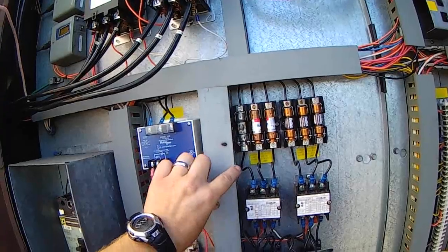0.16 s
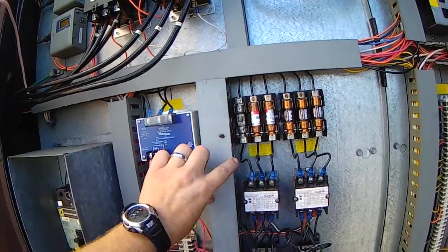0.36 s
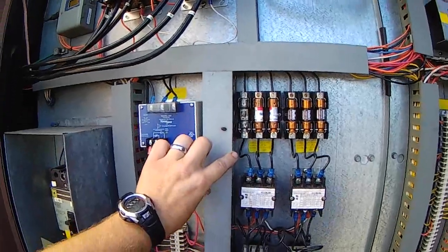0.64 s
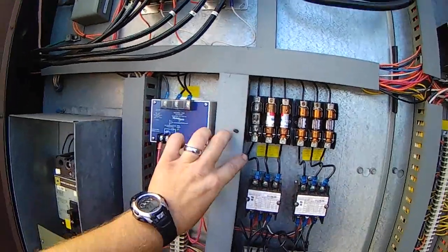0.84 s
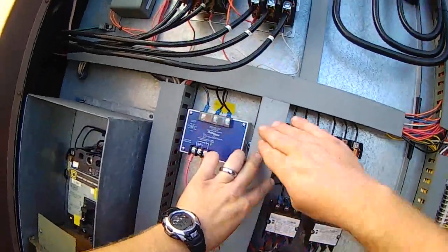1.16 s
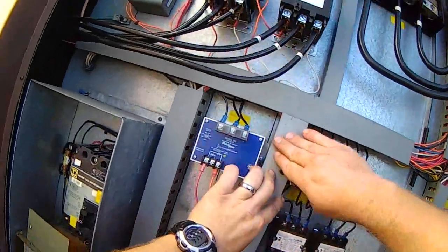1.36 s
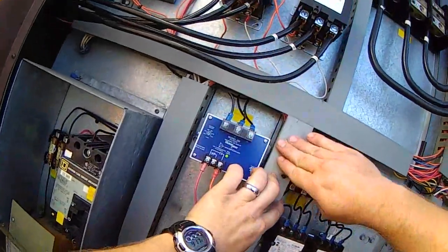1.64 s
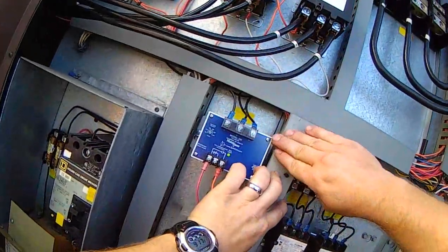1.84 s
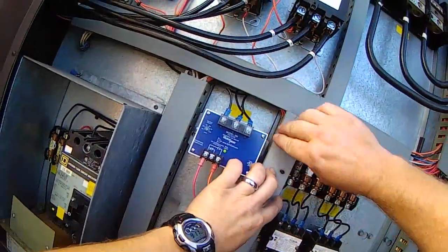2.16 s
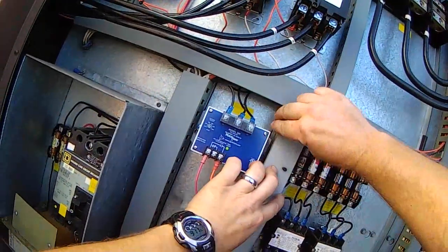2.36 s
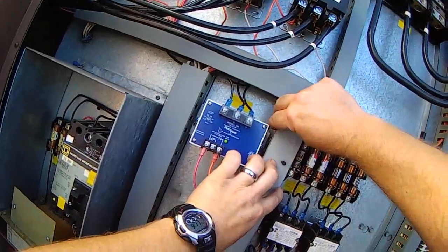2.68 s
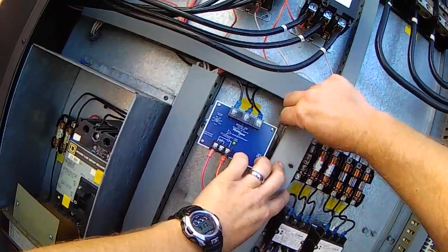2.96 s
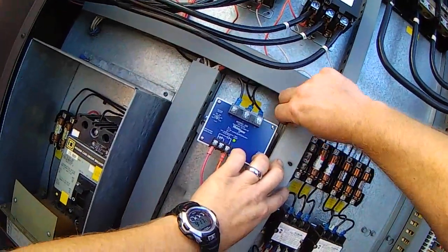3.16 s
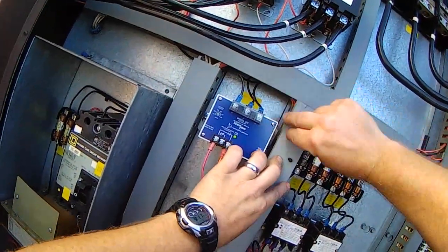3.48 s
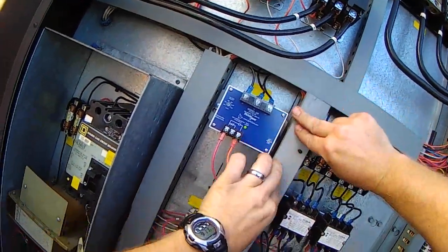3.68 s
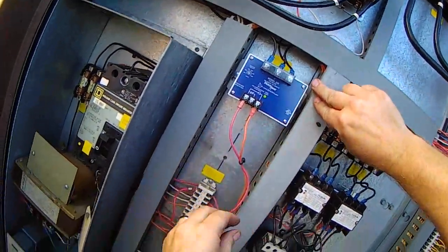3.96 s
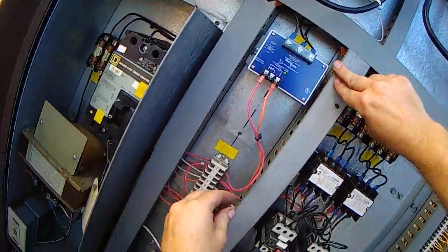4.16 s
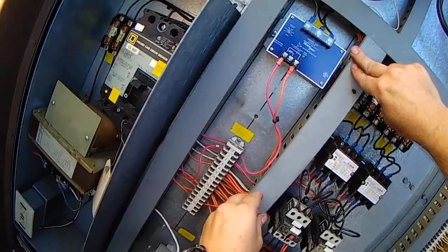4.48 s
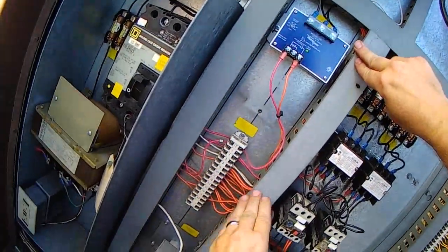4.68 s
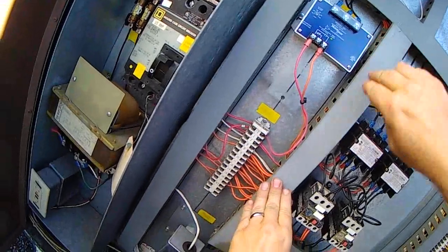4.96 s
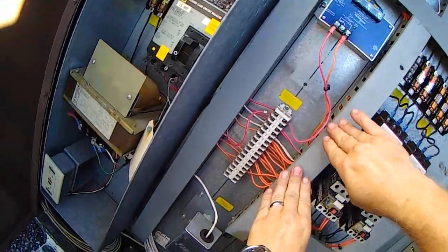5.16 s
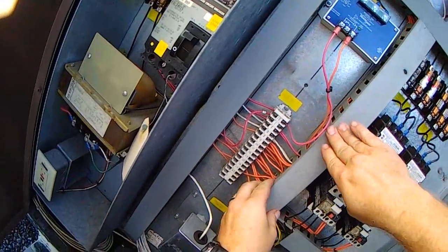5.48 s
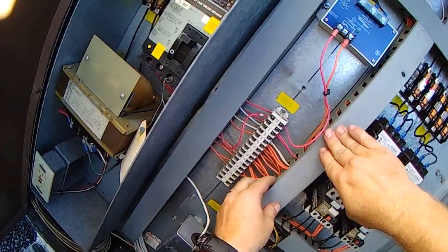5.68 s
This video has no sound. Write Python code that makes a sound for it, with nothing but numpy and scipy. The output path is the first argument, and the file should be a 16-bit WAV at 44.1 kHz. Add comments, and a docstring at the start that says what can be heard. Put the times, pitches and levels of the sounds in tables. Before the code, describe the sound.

Dry plastic clicks, crackles and soft thumps close by as a cabinet cover is pressed shut, with a constant motor hum behind.

```python
"""At an open steel cabinet near a large air-conditioning unit, hands press a plastic wiring-duct cover shut.
The cover snaps and creaks by stick-slip: bursts of small jolts ring its damped modes, and its body thumps low
under some snaps. Sliding fingers rub it, and a nail or clip ticks. The unit hums with sines on multiples of one
shaft speed, beside tones of other motors and mains-fed coils, over a rumble of moving air made of shaped noise.
A small microphone with a dull top leans into the cabinet, which shifts the levels of the hum and the air."""
import sys
import numpy as np
from scipy import signal
from scipy.fft import rfft, irfft
from scipy.io import wavfile
from scipy.ndimage import uniform_filter1d

SR = 44100
rng = np.random.default_rng(int(sys.argv[2]) if len(sys.argv) > 2 else 0)


def digitize_waveform(pressure):
    """Quantize a signal to 16-bit integers and store it at the path in sys.argv[1].

    Rows of a 2-D input are taken as channels; values are limited to [-1, 1].
    """
    field = np.atleast_2d(pressure).T
    bounded = np.clip(field, -1, 1)
    quanta = np.round(bounded * 32767).astype(np.int16)
    wavfile.write(sys.argv[1], SR, quanta)


def field_ratio(decibels):
    """Amplitude ratio for a level in dB (20 dB per decade); scalars and array-likes work."""
    return 10 ** (np.asarray(decibels, dtype=float) / 20)


N = 257103  # length in samples

# Damped modes of the cover and the cabinet: mode_hz [Hz], level_db [dB, relative],
# t60_s [s, decay by 60 dB after one slip]
COVER_MODES = [(391, -2.5, 0.024), (456, -4, 0.031), (635.4, -5.5, 0.039), (782, 8.5, 0.012),
               (902.5, 3.5, 0.045), (928, 5.5, 0.029), (1110, 2, 0.021), (1281, 12, 0.01),
               (1434, 10, 0.012), (1634, -3, 0.03), (1790, -2.5, 0.017), (1875, -4, 0.021),
               (2160, -2.5, 0.02), (2305, -3.5, .012), (2500, 2.5, 0.02), (2705, 0, 0.018),
               (2890, 2.5, 0.018), (3073, 5, 0.018), (3280, 1.5, 0.027), (3450, 6, 0.011),
               (3656, 2.5, 0.014), (3877, -1.5, 0.022), (4040, -3, 0.015), (4360, 4.5, 0.0089),
               (4760, 7, 0.0057), (4990, 9.5, 0.0081), (5530, 10, 0.0067), (5850, -3.5, 0.049),
               (6150, 6, 0.0064), (6500, -3, 0.032), (6890, 1.5, 0.0052), (7590, -7.5, 0.03),
               (7240, -1.5, 0.021), (7824, -7, 0.023)]
BODY_TOP_HZ = 2200  # the cover's body modes lie below this


def evened(x):
    """Normalization: scales a signal to an rms of 1."""
    return x / np.sqrt(np.mean(x ** 2) + 1e-20)


def read(points, hz):
    """Spectral interpolation: reads a spectrum table on a log-frequency axis."""
    f, value = np.transpose(points)
    return np.interp(np.log(hz + 1), np.log(f + 1), value)


def add(mix, start_s, sound):
    """Superposition: pressures add, so a sound is summed into the mix from start_s."""
    part = mix[round(start_s * SR):][:len(sound)]
    part += sound[:len(part)]


def drift(t, top_hz):
    """Slow random fluctuation: sines of random phase whose power falls as 1/f, scaled to an rms of 1."""
    total = 0
    for f in np.geomspace(top_hz / 20, top_hz, 12):
        total = total + np.sin(2 * np.pi * (f * t + rng.random())) / np.sqrt(f)
    return evened(total)


def lean(t):
    """Receiver position: how far the microphone leans into the cabinet, from 0 to 1."""
    # Path of the microphone: time_s [s], depth [0-1]
    lean_path = [(0, 0), (1.3, 0.05), (1.7, 0.8), (3, 0.79), (4.4, 0.71), (5.1, 0.88), (5.83, 0.9)]
    return np.interp(t, *np.transpose(lean_path))


def ring(body_db, body_hz, middle_hz, edge_db, spread_db):
    """Modal impulse response of the cover to one slip; its free length picks the modes that speak up."""
    edge_from_hz = 4300
    hz, db, t60 = np.transpose(COVER_MODES)[:, :, None]
    t = np.arange(2000) / SR
    level_chance, pitch_chance = rng.standard_normal((2, len(COVER_MODES), 1))
    # levels fall away with the squared distance in octaves from each favoured pitch, down to a floor
    body = (body_db - np.minimum(14 * np.log2(hz / body_hz) ** 2, 9)) * (hz < BODY_TOP_HZ)
    in_middle = (hz > BODY_TOP_HZ) * (hz < edge_from_hz)
    middle = -np.minimum(120 * np.log2(hz / middle_hz) ** 2, 7) * in_middle
    edge = edge_db * (hz > edge_from_hz)
    level_db = db + body + middle + edge + spread_db * level_chance
    decay = field_ratio(level_db - 60 * t / t60)
    # a finger is soft: low modes build over a cycle, none at once
    soft = 1 - np.exp(-1.1 * np.minimum(hz, 1400) * t)
    # neighbouring modes start in opposite directions
    sides = (-1.) ** np.arange(len(COVER_MODES))[:, None]
    waves = np.sin(2 * np.pi * hz * (1 + 0.014 * pitch_chance) * t)
    return (decay * soft * sides * waves).sum(0)


def slips(count, per_s, uneven_db):
    """Stick-slip friction: a random train of jolts of uneven size and either direction."""
    when, side, size = rng.random((count, 3)).T
    happens = when < per_s / SR
    return happens * np.sign(side - .5) * field_ratio(-uneven_db * np.log(size + 0.11))


def snap(peak_db, body_hz, body_db, middle_hz, edge_db, slide_s):
    """Stick-slip release: slips start hard, ease while the latch slides, then die into the cabinet's echo."""
    rise_s, slide_fade_db, dying_t60_s = 0.0004, -4.5, 0.016
    first_slip = 2.6  # the break-away jolt, against a slip of 0 dB
    echo_db, echo_t60_s = -22, 0.13
    t = np.arange(10000) / SR
    rise = np.minimum(t / rise_s, 1)
    slide_db = slide_fade_db * np.minimum(t / slide_s, 1)
    dying_db = -60 * np.maximum(t - slide_s, 0) / dying_t60_s
    jolts = slips(count=len(t), per_s=650, uneven_db=3.5) * rise * field_ratio(slide_db + dying_db)
    jolts[round(rise_s * SR)] = first_slip
    # many overlapping reflections act as decaying noise
    echo = rise * field_ratio(echo_db - 60 * t / echo_t60_s) * rng.standard_normal(len(t))
    response = ring(body_db, body_hz, middle_hz, edge_db, spread_db=0.5)
    sound = signal.fftconvolve(jolts + echo, response)
    return field_ratio(peak_db) * sound / (abs(sound).max() + 1e-9)


def thump(peak_db, body_hz):
    """Selective modal excitation: a soft onset wakes the cover's body modes alone, mostly near body_hz."""
    body_modes = [mode for mode in COVER_MODES if mode[0] < BODY_TOP_HZ]
    hz, _, t60 = np.transpose(body_modes)[:, :, None]
    t = np.arange(3000) / SR
    near_db = -40 * np.log2(hz / body_hz) ** 2
    decay = field_ratio(near_db - 60 * t / (t60 + 0.11))  # each t60 is 0.11 s longer than after a slip
    soft = 1 - np.exp(-t / 0.00069)
    waves = np.sin(2 * np.pi * (hz * t + rng.random(hz.shape)))
    sound = (decay * soft * waves).sum(0)
    return field_ratio(peak_db) * sound / abs(sound).max()


def tick(impulse_db):
    """Hard impact: one impulse and a faint short scatter through a minimum-phase filter."""
    # Spectrum of the strike: freq_hz [Hz], level_db [dB, relative]
    tick_colour = [(710, -6), (1200, -4.5), (2670, -13), (4100, -23), (6370, -21), (7310, -24.5),
                   (7740, -28), (8400, -81), (10900, -101), (18500, -120)]
    log_gain = np.log(field_ratio(read(tick_colour, abs(np.fft.fftfreq(2048, 1 / SR)))))
    # phase derived from the log gain leaves no ringing ahead of the strike
    pulse = np.fft.ifft(np.exp(np.conj(signal.hilbert(log_gain)))).real[:1024]
    t = np.arange(1500) / SR
    scatter = 0.046 * rng.standard_normal(1500) * field_ratio(-60 * t / 0.041)
    scatter[0] = 1
    return field_ratio(impulse_db) * np.convolve(scatter, pulse / abs(pulse).max())


def rub():
    """Sliding friction: dense slips under the fingers ring the same cover; each stroke swells and eases."""
    # Strokes along the cover: start_s [s], length_s [s], level_db [dB rms at the top of the swell]
    strokes = [(3.70, 0.27, -43.5)]
    jolts = slips(count=N, per_s=2500, uneven_db=1)
    response = ring(body_db=7, body_hz=1200, middle_hz=3100, edge_db=-23, spread_db=0)
    scuff = signal.fftconvolve(jolts, response)[:N]
    t = np.arange(N) / SR
    press = 0
    for start_s, length_s, level_db in strokes:
        progress = np.clip((t - start_s) / length_s, 0, 1)
        press = press + field_ratio(level_db) * np.sin(np.pi * progress) ** 2
    return press * evened(scuff)


def hum():
    """Harmonic series of a rotating shaft, with other tones: sines waver as sound paths shift."""
    shaft_hz = 28.1
    # Multiples of the shaft speed with the microphone out: {multiple: level_db [dB rms]}
    order_db = {2: -48.5, 4: -58.5, 6: -62, 7: -64, 8: -48.5, 9: -60.5, 10: -56, 11: -50, 12: -49, 13: -57,
                14: -51.5, 15: -55, 16: -52, 17: -53.5, 18: -51, 19: -55.5, 22: -60, 23: -56, 26: -52.5, 28:
                -52.5, 32: -52.5, 35: -56.5}
    # What a full lean adds to some multiples: {multiple: change_db [dB]}
    lean_order_db = {6: 22.5, 8: -19, 10: 5, 11: 3, 12: 0.5, 16: -2, 18: -1.5, 28: -1, 32: 1.5}
    # Course of the 30th multiple: time_s [s], level_db [dB rms]
    thirtieth = [(0, -49), (1.3, -48), (1.7, -50), (2.2, -53), (3.1, -50), (4, -50.5), (4.7, -48),
                 (5.83, -47)]
    # Tones of other motors and of mains-fed coils: pitch_hz [Hz], level_db [dB rms]
    other_tones = [(45.6, -51), (116, -56), (120, -55), (148, -51), (240, -61), (360, -57), (907, -59),
                   (991, -62), (1026, -63), (1321, -62)]
    t = np.arange(0, N + 64, 64) / SR  # coarse time for the slow changes
    time = np.arange(N) / SR
    lines = []
    for k, db in order_db.items():
        lines.append((shaft_hz * k, db + lean_order_db.get(k, 0) * lean(t)))
    lines += other_tones
    lines.append((shaft_hz * 30, np.interp(t, *np.transpose(thirtieth))))
    total = 0
    for hz, db in lines:
        level_db = db + .7 * drift(t, top_hz=2.5) + 1.5 * drift(t, top_hz=25)
        turns = 0.03 * drift(t, top_hz=12)  # phase wander in cycles
        cycles = hz * time + np.interp(time, t, turns) + rng.random()
        level = np.interp(time, t, field_ratio(level_db))
        total = total + np.sqrt(2) * level * np.sin(2 * np.pi * cycles)
    return total


def air():
    """Broadband flow noise: random short-time spectra in drifting patches; the lean shifts their colour."""
    air_db = -35.5  # rms level
    # Spectrum of the moving air: freq_hz [Hz], level_db [dB per Hz, relative]
    air_colour = [(15, -25.5), (30, -4), (45, 2.5), (75, 0.5), (100, -2), (150, -5), (259, -10), (584, -12),
                  (833, -11), (1460, -16.5), (2300, -33.5), (3040, -27.5), (3820, -36), (4450, -48),
                  (5050, -40.5), (7390, -48), (8600, -70.5)]
    # What a full lean adds to the air: freq_hz [Hz], change_db [dB]
    lean_air = [(40, -1.5), (75, -4.5), (110, 3), (160, 3), (400, 0.5), (1200, -2.5), (4000, -3)]
    frames, hz = N // 256 + 5, np.fft.rfftfreq(1024, 1 / SR)
    a, b, patches = rng.standard_normal((frames, 513, 3)).T
    patches = uniform_filter1d(patches, size=10, axis=0)  # smooth over frequency
    patches = evened(uniform_filter1d(patches, size=12, axis=1))  # and over time
    t = np.arange(frames) * 256 / SR
    swell_db = read(lean_air, hz)[:, None] * lean(t)
    spectra = (a + 1j * b) * field_ratio(swell_db + 1.5 * patches)
    grain = signal.istft(spectra, nperseg=1024, noverlap=768)[1][:N]
    gain = field_ratio(read(air_colour, np.fft.rfftfreq(N, 1 / SR)))
    return field_ratio(air_db) * evened(irfft(rfft(grain) * gain, N))


def scene():
    """Superposition of the handling close by with the hum and the air."""
    # Snaps and creaks: start_s [s], peak_db [dB], body_hz [Hz, body centre], body_db [dB against the
    # middle modes], middle_hz [Hz, middle centre], edge_db [dB against the middle modes], slide_s [s]
    snaps = [(0.009, -32, 1270, -5, 3050, -29, 0.006), (0.015, -20.5, 1270, 3, 3050, -30, 0.005),
             (0.019, -18, 1270, 10, 3150, -25, 0.0069), (0.029, -24, 1100, 11, 3100, -24, 0.018),
             (0.439, -33, 1290, 4, 2660, -16, 0.0078), (0.45, -16, 1240, -0.5, 3100, -20.5, 0.0069),
             (.456, -16.5, 1260, 1, 3230, -18, 0.0075), (.464, -25, 900, 14, 3120, -18, 0.0047),
             (0.483, -44, 900, 8, 3300, -18, .003), (0.637, -21.5, 1200, 1.5, 2820, -16, 0.0039),
             (0.642, -28, 1000, 0, 3650, -16.5, 0.0039), (0.692, -23, 1110, 1, 2830, -17, 0.006),
             (.701, -21.5, 1140, 6, 3300, -22, 0.0098), (.714, -27, 1000, 3, 3200, -14, .005),
             (0.726, -27, 840, -3, 3070, -28, 0.006), (1.514, -29, 1270, 7, 3200, -22, 0.0095),
             (1.584, -22, 865, 6, 3350, -18, 0.015), (1.696, -19.5, 1010, 6, 3400, -18, 0.003),
             (1.701, -19, 1200, 3.5, 3370, -18, 0.0071), (1.709, -16.5, 910, 7.5, 2880, -14, 0.004),
             (1.714, -21.5, 930, 1, 3280, -15.5, .003), (1.720, -23.5, 1110, 6, 3130, -9, 0.011),
             (1.734, -18.5, 1300, 5, 3450, -17, 0.0039), (1.739, -23, 1300, 4, 3400, -11, .003),
             (1.747, -30, 1100, 1, 3200, -7, .006), (1.755, -20, 1270, 3, 3340, -18, 0.0028),
             (1.759, -21.5, 1100, 10, 3300, -15, .004), (1.764, -19.5, 1310, 6.5, 3370, -19.5, 0.0037),
             (1.769, -22.5, 1200, 1, 3280, -16, 0.0045), (1.778, -34, 1200, -2, 3100, -5, .003),
             (1.789, -37, 840, 3, 3240, -6.5, 0.024), (2.184, -38.5, 860, -3, 3020, -20, 0.014),
             (2.233, -39, 900, -0.5, 3200, -16, 0.012), (2.332, -22, 1430, 7, 3360, -14, 0.003),
             (2.336, -17.5, 1100, 4.5, 3200, -15, .006), (2.344, -20.5, 1300, 3, 3300, -13, .004),
             (2.349, -25.5, 875, 1, 3200, -9, 0.0094), (2.360, -25.5, 1400, 4, 3300, -13, 0.0081),
             (2.372, -35, 1200, -1, 3200, -11, .006), (2.820, -23.5, 1340, 3, 3280, -20, 0.0033),
             (2.824, -20.5, 1330, 8.5, 3130, -15, .004), (2.829, -20, 1100, 5, 3100, -11, 0.0032),
             (2.833, -25, 1300, 8, 3130, -17, 0.0027), (2.837, -20.5, 1320, 7, 3120, -18, .003),
             (2.843, -22.5, 1270, 6, 3120, -12, 0.0064), (2.850, -31, 900, 6, 3200, -14, 0.0032),
             (2.886, -22.5, 1350, 2, 2980, -16, 0.003), (2.890, -19.5, 1300, 8, 2960, -12, 0.0046),
             (2.898, -27, 1290, 8, 3100, -8, 0.0088), (2.913, -19.5, 1270, 7, 3100, -20, 0.003),
             (2.917, -23, 1210, 5, 3120, -11, 0.0024), (2.924, -27.5, 1280, 4, 3000, -14, 0.0038),
             (2.93, -34, 1200, 3, 3120, -10, 0.0052), (3.15, -21, 1310, 7, 3050, -13, 0.0038),
             (3.155, -23.5, 1310, 3, 3160, -12, 0.003), (3.329, -19.5, 1300, -5.5, 2800, -17, 0.0037),
             (3.332, -23.5, 1100, -3, 2800, -7, .004), (3.338, -27, 1240, 9, 3330, -9, 0.01),
             (3.761, -52, 1100, -6, 2820, -15, .004), (3.825, -45, 982, 9, 3530, -23, 0.0045),
             (3.917, -32, 1120, 7.5, 3450, -22, 0.005), (4.335, -13, 1350, 9.5, 3300, -21, 0.0038),
             (4.338, -16.5, 1340, 4, 3500, -13, 0.0085), (4.346, -30.5, 900, 5, 3330, -8.5, .006),
             (4.352, -44, 870, 13, 3120, 3, 0.0031), (5.04, -39, 880, 2, 2880, -9, .012),
             (5.097, -21, 1370, 9, 3350, -8.5, 0.0012), (5.103, -32, 1100, 0, 3560, -13, 0.0039),
             (5.424, -36, 1500, -2, 3400, -12, 0.0033), (5.435, -28.5, 1630, 4, 3250, -28, 0.003),
             (5.441, -28.5, 1600, 4, 3340, -16, 0.0059)]
    # Low thumps of the cover's body, mostly together with a snap:
    # start_s [s], peak_db [dB], body_hz [Hz, body centre]
    thumps = [(.018, -23, 540), (0.452, -30, 382), (0.701, -27.5, 1130), (1.586, -28, 950),
              (1.711, -24, 790), (1.735, -37, 950), (2.238, -29, 637), (2.916, -41, 1000),
              (3.332, -27.5, 614), (4.338, -31, 920)]
    # A nail or clip strikes once: start_s [s], impulse_db [dB, peak of the bare impulse]
    ticks = [(0.9667, -20.5), (2.961, -28), (5.7528, -21)]
    mix = rub() + hum() + air()
    for start_s, *how in snaps:
        add(mix, start_s, snap(*how))
    for start_s, *how in thumps:
        add(mix, start_s, thump(*how))
    for start_s, impulse_db in ticks:
        add(mix, start_s, tick(impulse_db))
    return mix[None]


def top_cut(x):
    """Nothing passes above the cut-off."""
    return signal.sosfilt(signal.butter(12, 8790, fs=SR, output="sos"), x)


def record(dry):
    """Band limitation: a linear-phase low-pass at 8150 Hz gives the dull top."""
    low_pass = signal.firwin(511, 8150, window=("kaiser", 9), fs=SR)
    dull = signal.oaconvolve(dry, low_pass[None], "same")
    return top_cut(dull)


dry = scene()
out = record(dry)
digitize_waveform(out)
```